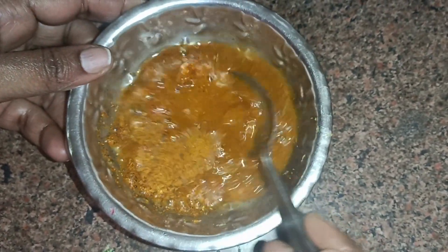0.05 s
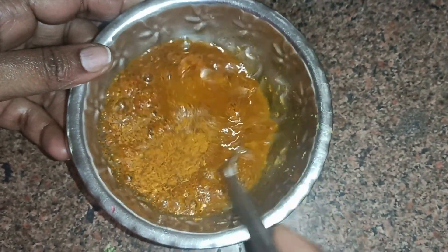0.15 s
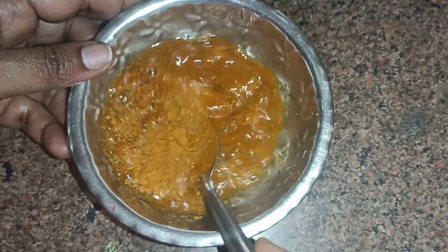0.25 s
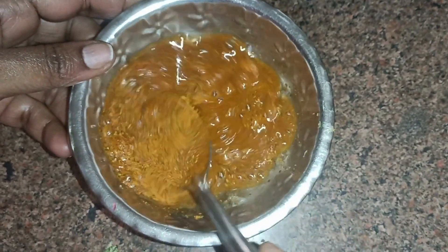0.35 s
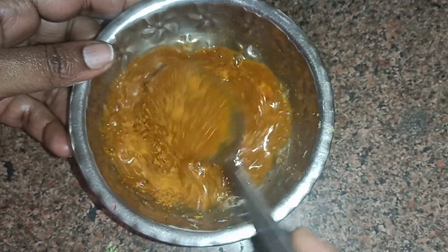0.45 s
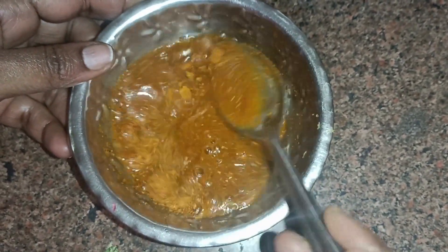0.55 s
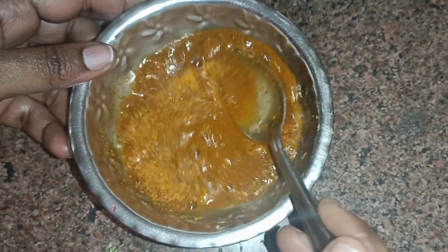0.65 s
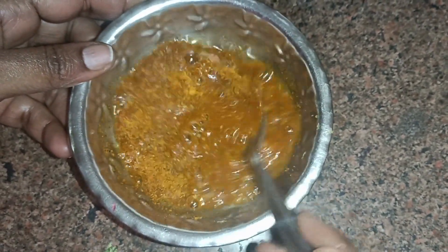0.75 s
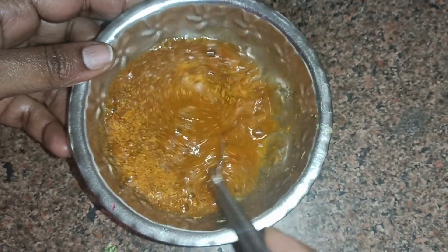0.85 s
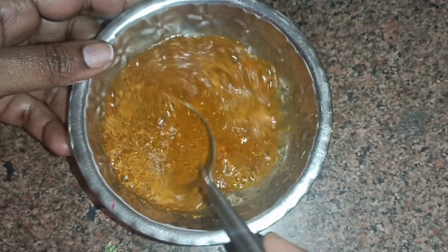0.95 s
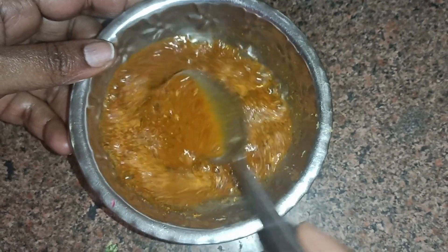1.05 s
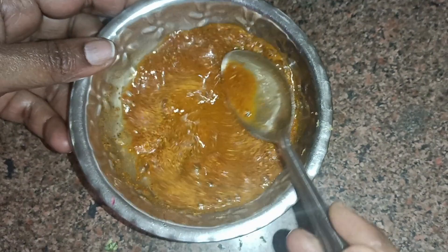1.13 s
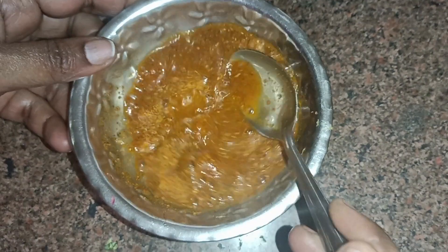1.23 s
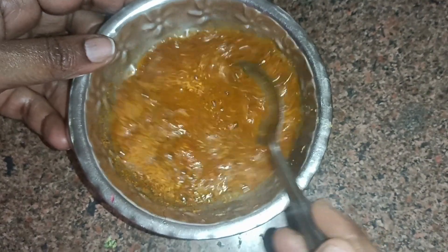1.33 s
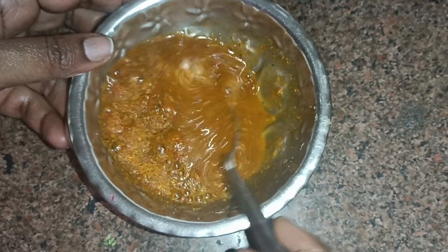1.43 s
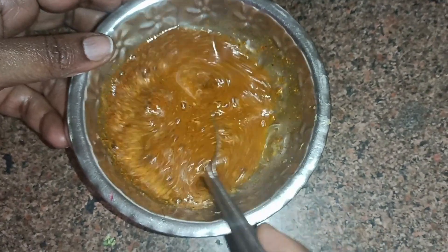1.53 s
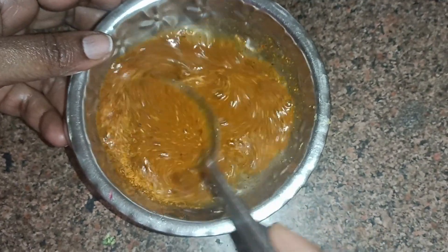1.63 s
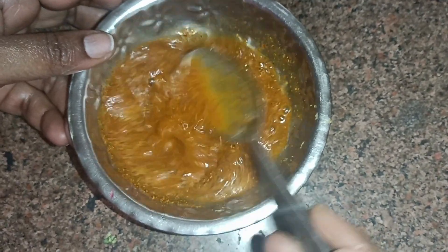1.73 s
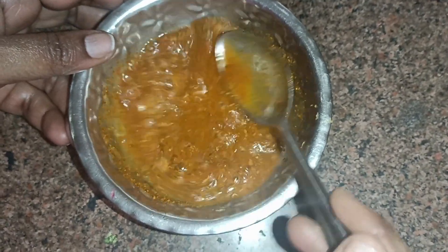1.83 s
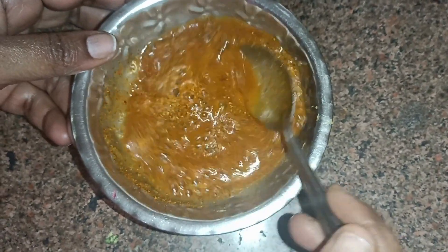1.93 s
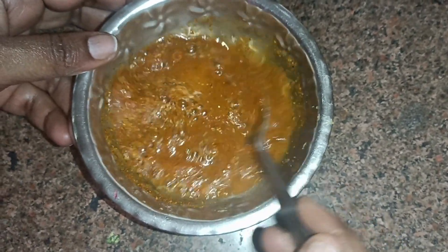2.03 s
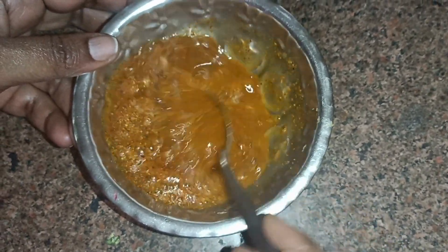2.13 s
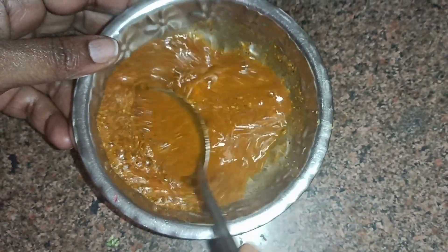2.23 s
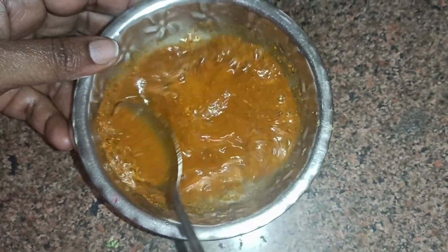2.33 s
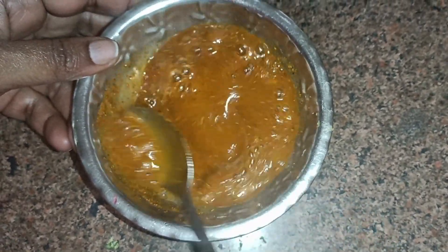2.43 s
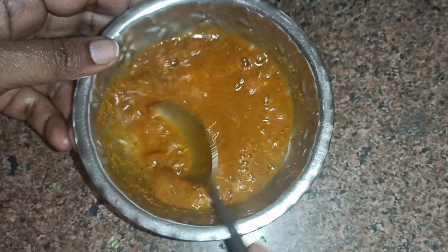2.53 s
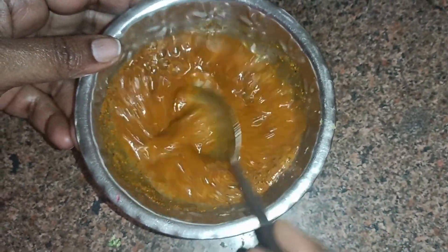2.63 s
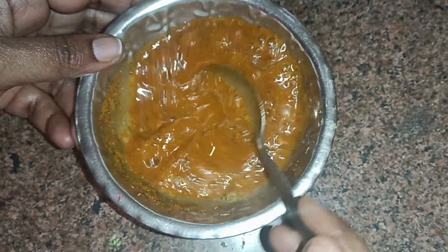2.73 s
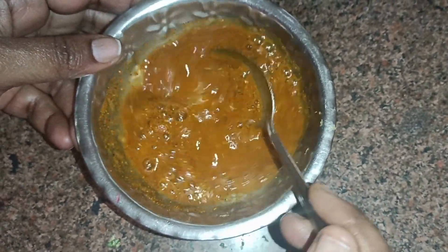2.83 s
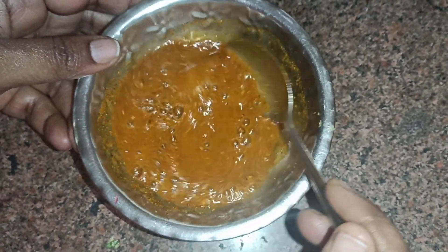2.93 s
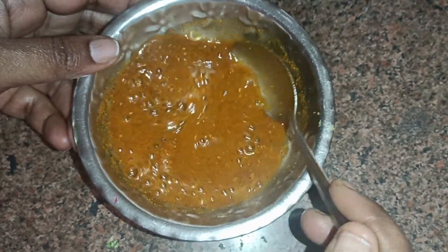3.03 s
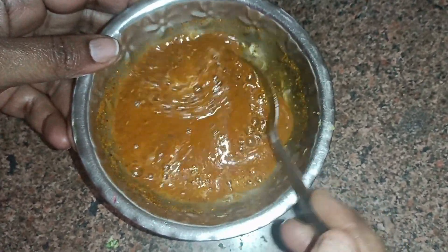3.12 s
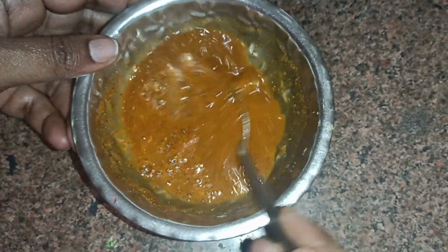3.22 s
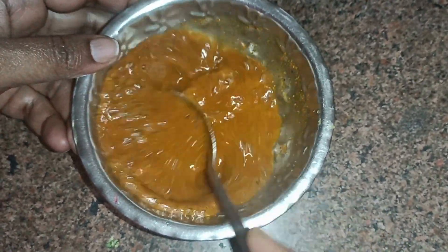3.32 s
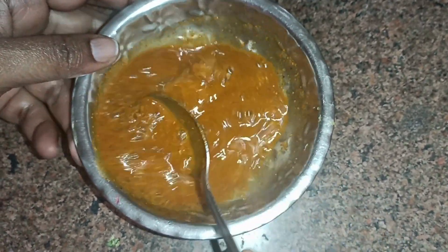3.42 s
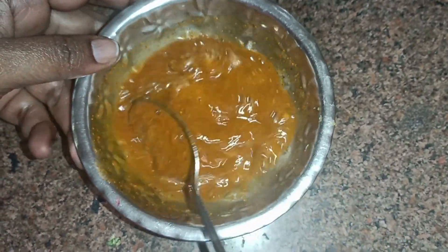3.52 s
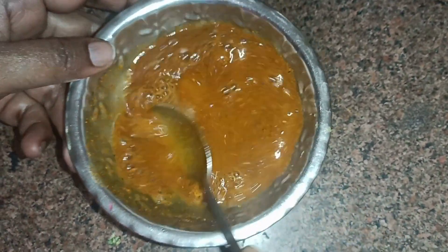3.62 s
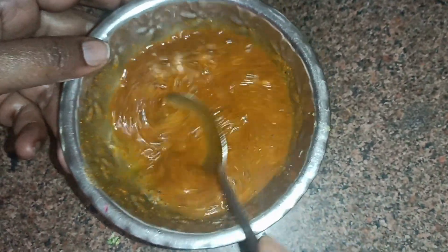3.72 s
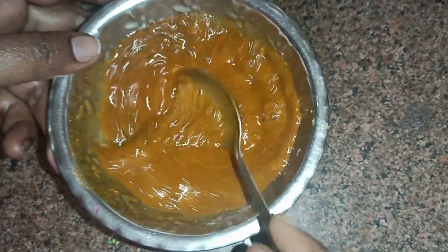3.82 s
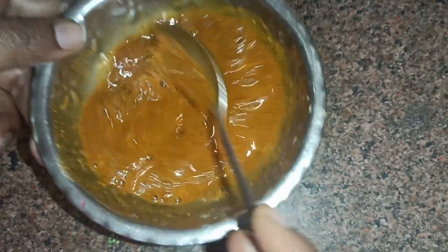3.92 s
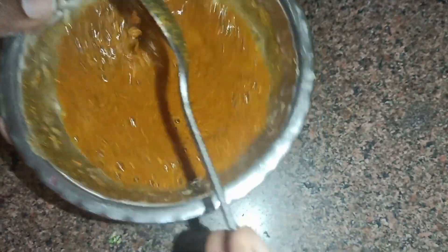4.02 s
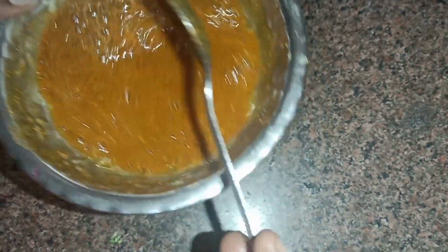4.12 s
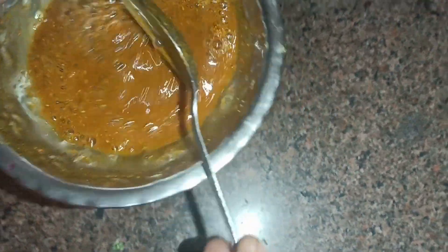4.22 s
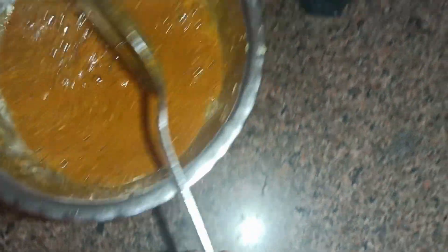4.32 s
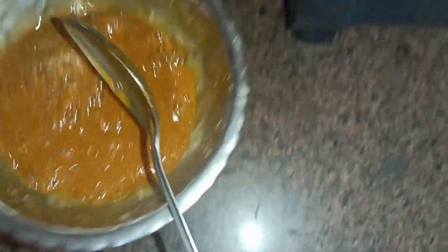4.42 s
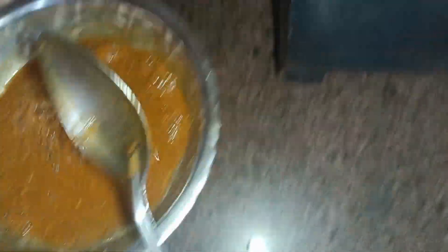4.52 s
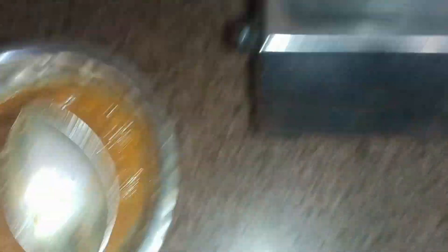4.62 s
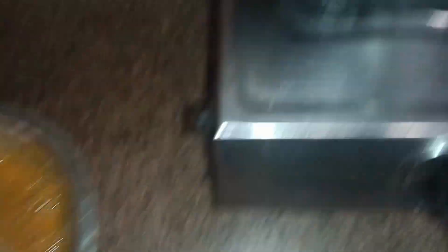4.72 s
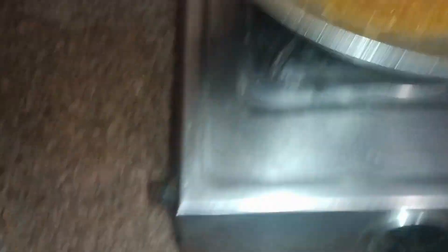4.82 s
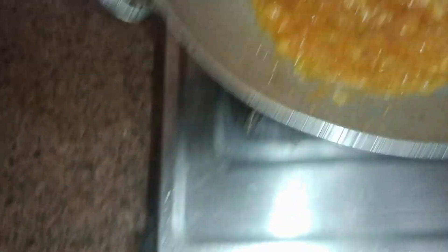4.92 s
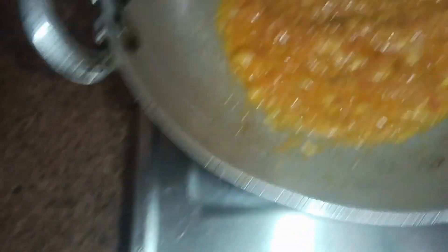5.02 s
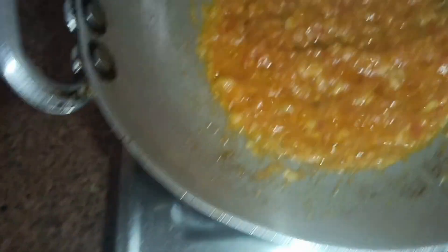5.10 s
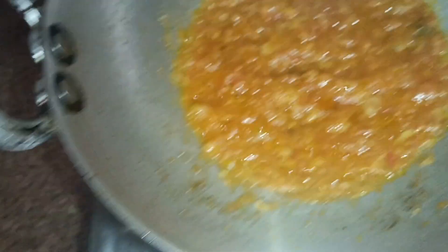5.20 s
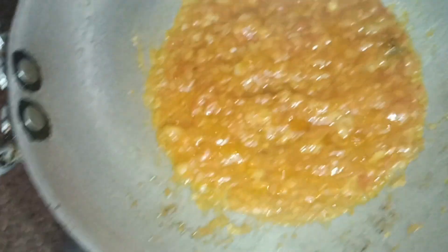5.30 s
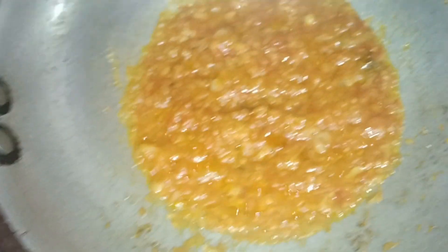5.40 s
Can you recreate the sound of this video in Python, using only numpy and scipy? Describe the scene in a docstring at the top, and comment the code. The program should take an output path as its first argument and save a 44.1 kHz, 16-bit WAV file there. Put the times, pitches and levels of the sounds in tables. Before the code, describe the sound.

Intermittent metallic scrapes stir a thick paste over a faint frying hiss, ending with a bowl drag, ringing clinks and nearer crackling sizzle.

```python
"""Stirring spice paste in a small steel bowl

A steel spoon scrapes the bowl's wall by stick-slip friction, which excites the bowl's modes, and faint fuzzy
tones slide in pitch. The bowl is dragged off a stone counter with a judder and hums in the hand; three clinks
ring the bare steel. A pan of sauce sizzles throughout as random bubble bursts, and comes close at the end.
Scrapes, clinks and spits of the pan are reflected by a small hard kitchen; a low room rumble lies under all."""
import sys
import numpy as np
from scipy import signal
from scipy.fft import rfft, irfft, next_fast_len
from scipy.io import wavfile
from scipy.ndimage import map_coordinates

SR = 44100
rng = np.random.default_rng(int(sys.argv[2]) if len(sys.argv) > 2 else 0)


def waveform_to_disk(signal):
    """Save audio, clipped to [-1, 1], as 16-bit WAV at the path in sys.argv[1]."""
    frames = np.transpose(np.atleast_2d(signal))
    scaled = np.clip(frames, -1, 1) * 32767
    samples = np.round(scaled).astype(np.int16)
    wavfile.write(sys.argv[1], SR, samples)


N = 240551
T = np.arange(N) / SR
DRAG_START_S = 4.172  # the murmur and faint tones end and the bowl's foot starts to slide
NOTE_HZ = 229  # the loaded bowl's main note


def amp(db):
    """Level law: decibels to amplitude gain."""
    return 10 ** (np.asarray(db) / 20)


def unit(x):
    """Normalization: scale to rms 1."""
    return x / np.sqrt(np.mean(x ** 2) + 1e-20)


def along(points, hz):
    """Interpolation of (Hz, value) points on a logarithmic frequency axis."""
    f, v = np.transpose(points)
    return np.interp(np.log(hz + 1), np.log(f + 1), v)


def curves(rows):
    """Linear interpolation in time: one value per sample for each column after the time."""
    s, *cols = np.transpose(rows)
    return [np.interp(T, s, c) for c in cols]


def wobble(rate):
    """Low-pass randomness: a smooth curve through random knots, rate of them a second."""
    knots = rng.standard_normal(int(N * rate / SR) + 4)
    return map_coordinates(knots, [T * rate])


def envelope(start, attack, end, release):
    """Linear growth over the attack, then from the end exponential decay by 60 dB per release."""
    rise = np.clip((T - start) / attack, 0, 1)
    return rise * amp(-60 * np.maximum(T - end, 0) / release)


def filtered(x, response):
    """Linear filtering: the spectrum of x times a response of frequency."""
    m = next_fast_len(N + SR // 2)
    return irfft(rfft(x, m) * response(np.fft.rfftfreq(m, 1 / SR)), m)[:N]


def coloured(x, spectrum):
    """Spectral shaping: x filtered by (Hz, dB) points, at rms 1."""
    return unit(filtered(x, lambda hz: amp(along(spectrum, hz))))


def band(hz, width_hz):
    """Random modulation of a carrier: narrow noise of rms 1 around a moving pitch."""
    carrier = np.exp(2j * np.pi * np.cumsum(hz) / SR)
    modulation = wobble(width_hz) + 1j * wobble(width_hz)
    return unit(np.real(modulation * carrier))


def add(track, s, x):
    """Superposition: mix x into the track at time s."""
    part = track[max(round(s * SR), 0):][:len(x)]
    part += x[:len(part)]


def ring(modes, scatter_db, tone_db=(0, 0, 0)):
    """Modal response: one contact excites damped sines, with a given strength in each register."""
    # Centres of the low, middle and high register in Hz.
    register_hz = [1600, 3200, 6500]
    t = np.arange(SR // 6) / SR
    hz, width, db = np.transpose(modes)[:, :, None]
    tone = np.interp(np.log(hz), np.log(register_hz), tone_db)
    gain = amp(db + tone + scatter_db * rng.standard_normal(hz.shape))
    sign = (-1) ** np.arange(len(hz))[:, None]  # neighbouring modes move in opposite directions
    decay = 2 * np.pi * width / SR * np.exp(-np.pi * width * t)
    return np.sum(sign * gain * decay * np.sin(2 * np.pi * hz * t), axis=0)


def kitchen(x, room_db, near_db):
    """Room acoustics: direct sound, quick echoes off bowl and counter, and a decaying diffuse tail."""
    # Reverberation of the room. Each row: frequency in Hz, time to fall 60 dB in seconds.
    reverb_s = [(200, 0.23), (1500, 0.37), (4000, 0.33), (8000, 0.2), (15000, 0.16)]
    hz, t, z = signal.stft(rng.standard_normal(SR // 2), SR, nperseg=256)
    decay = amp(-60 * t / along(reverb_s, hz)[:, None])
    tail = signal.istft(z * decay, SR, nperseg=256)[1]
    t = np.arange(len(tail)) / SR
    tail = tail * (1 - np.exp(-t / 0.0097))  # the diffuse field builds up
    near = rng.standard_normal(len(t)) * amp(-60 * t / 0.06) * (t > .001)
    echo = amp(room_db) * tail / np.linalg.norm(tail) + amp(near_db) * near / np.linalg.norm(near)
    echo[0] = 1  # direct sound
    return signal.fftconvolve(x, echo)


def rumble():
    """Broadband room noise: shaped random pressure whose level drifts slowly."""
    # Rumble spectrum. Each row: frequency in Hz, relative level in dB.
    hum_spectrum = [(15, -68), (25, -57), (59, 1), (102, 3.5), (162, 5), (189, -21), (220, 0.5), (406, -6),
                    (454, -7), (700, -19.5), (910, -22), (1540, -120)]
    return amp(-81.5 + 1.6 * wobble(6.05)) * coloured(rng.standard_normal(N), hum_spectrum)


def frying(rate, spread_db):
    """Shot noise: random bubble bursts, a few much larger than the rest, over an equally strong hiss."""
    sizes = amp(spread_db * np.minimum(rng.exponential(size=N), 5))
    bursts = (rng.random(N) < rate / SR) * rng.standard_normal(N) * sizes
    return unit(bursts) + rng.standard_normal(N)


def bubbles(rate=450, spread_db=3):
    """Bubble resonance: the bigger bubbles of the sauce each give a brief, decaying high ping."""
    out, t = np.zeros(N), np.arange(SR // 25) / SR
    for pitch, life, size in rng.standard_normal(size=(int(rate * N / SR), 3)):
        hz = np.clip(6200 * np.exp(.25 * pitch), 2500, 10000)
        decay = np.exp(-t / (.003 * np.exp(.4 * life)))
        ping = amp(spread_db * size) * decay * np.sin(2 * np.pi * hz * t)
        add(out, rng.uniform(0, N / SR), ping)
    return unit(out)


def bright_sweep():
    """Moving noise band: a bright band of the sizzle swells, sinks in pitch and dies as the pan comes near."""
    start_s, attack_s, release_s = 4.81, .07, 0.69
    hz = 6300 * 2 ** (-0.9 * np.maximum(T - start_s, 0))  # falls 0.9 octave a second
    swell = envelope(start_s, attack_s, start_s + attack_s, release_s)
    return amp(-49) * swell * band(hz, width_hz=910)


def pan():
    """Bubble noise and modal ringing: a far hiss, then fuller close sizzle where each spit rings the pan."""
    # Spectra of the pan from afar, of the finest spray, and of the pan close by.
    # Each row: frequency in Hz, relative level in dB.
    far_spectrum = [(240, -76), (400, -42), (453, -12.5), (545, -11), (719, -6), (789, -12.5),
                    (1230, -11.5), (1600, -11.5), (2250, -10), (2710, -10), (6540, 2.5), (9180, 4),
                    (13500, -29), (15000, -7.5), (16000, -17)]
    spray_spectrum = [(4000, -51), (10000, -22), (13500, 3), (14600, -11), (15500, 0), (16000, 11.5)]
    near_spectrum = [(240, -49), (400, -27), (467, -10.5), (545, -46), (719, -19.5), (1160, -29),
                     (1420, -7), (1630, -24), (2120, -15.5), (2250, -19), (2430, -31), (5960, -1.5),
                     (9320, -5.5), (11800, -27.5), (16000, -21)]
    # Close sizzle before its fade-in. Each row: time in seconds, level in dB.
    approach = [(4.75, -57), (4.84, -58), (4.9, -53), (5.0, -51), (5.28, -55.5), (5.45, -54)]
    # Modes of the pan. Each row: frequency in Hz, width in Hz, relative level in dB.
    pan_modes = [(720, 350, -22), (1415, 70, -2.5), (2870, 420, -10), (3820, 250, -9), (5200, 570, -5.5),
                 (6570, 640, 0), (7550, 1600, -13)]
    # Spits. Each row: start in seconds, then strength of the low, middle and high register in dB.
    spits = [(5.3062, -14, -14, -8.5), (5.323, -9.5, -28, -33), (5.336, -22, -41, -18),
             (5.406, -15, -15, -28)]
    far = amp(-58 + 1.0 * wobble(14)) * coloured(frying(rate=2500, spread_db=1), far_spectrum)
    spray = amp(-74) * coloured(frying(rate=2500, spread_db=2), spray_spectrum)
    close_db, = curves(approach)
    fade_in = np.clip((T - 4.4) / 0.38, 0, 1)  # the pan comes into the open
    sizzle = coloured(frying(rate=2300, spread_db=3.5), near_spectrum) + amp(-8) * bubbles()
    out = far + spray + amp(close_db) * fade_in * sizzle + bright_sweep()
    for s, *tone_db in spits:
        add(out, s, kitchen(ring(pan_modes, 2.0, tone_db), room_db=-2, near_db=0.5))
    return out


def drag():
    """Friction-induced judder: the bowl's foot rasps and groans over the stone."""
    # Rasp of the foot. Each row: frequency in Hz, relative level in dB.
    foot_spectrum = [(53, -58), (90, -32), (150, -6), (187, -8), (226, -2.5), (333, -7), (424, -2.5),
                     (528, -14), (575, -11.5), (747, -8.5), (1100, -17), (1430, -39), (2420, -120)]
    # The sound eases by 65 dB a second as the hand takes the weight.
    weight = amp(-45.5 - 65 * np.maximum(T - DRAG_START_S, 0))
    sliding = weight * envelope(DRAG_START_S, attack=0.038, end=4.368, release=0.42)
    rasp = coloured(rng.standard_normal(N) * amp(1.7 * wobble(90)), foot_spectrum)
    # The rate of judder sags once, as the foot grips.
    groan_hz = 331.3 - 95.6 * np.exp(-((T - 4.268) / .028) ** 2)
    return sliding * (amp(-4) * rasp + amp(-6) * band(groan_hz, width_hz=120))


def tilt_hum():
    """Liquid loading of a mode: one of the lifted bowl's rings bends as the liquid tilts."""
    # Bending pitch. Each row: time in seconds, frequency in Hz.
    tilt = [(4.18, 706), (4.33, 732.6), (4.42, 651), (4.46, 713), (4.61, 706), (4.68, 608), (4.73, 619),
            (4.76, 753), (4.84, 710)]
    # Free ringing. Each row: start in seconds, end of the hold in seconds, level in dB.
    free_rings = [(4.187, 4.445, -71.5), (4.616, 4.79, -67.5)]
    hz, = curves(tilt)
    note = unit(np.sin(2 * np.pi * np.cumsum(hz) / SR + .7 * wobble(80)))
    ringing = sum(amp(db) * envelope(start, .015, end, 0.11) for start, end, db in free_rings)
    return amp(2.9 * wobble(40)) * ringing * note


def churn(level_db=-89, swing_db=4):
    """Random excitation of a resonance: the moving paste keeps the bowl's main note murmuring."""
    stirring = T < DRAG_START_S
    murmur = band(np.full(N, NOTE_HZ), width_hz=90)
    return amp(level_db + swing_db * wobble(7.91)) * stirring * murmur


def notes(swell_s=0.0086, ring_db=8):
    """Damped resonance: the shoved paste makes the loaded bowl answer with brief, mostly low, soft notes."""
    # Notes. Each row: start in seconds, frequency in Hz, level in dB before the common gain ring_db.
    glugs = [(1.569, 221, -61.5), (1.66, 255, -70.5), (2.58, 229, -72), (1.871, 150, -69),
             (2.428, 229, -52.5), (2.456, 3590, -44.5), (2.459, 2770, -52), (2.501, 229, -57),
             (3.149, 230, -73), (3.395, 2180, -63), (3.631, 145, -71), (3.748, 151, -71)]
    out, t = np.zeros(N), np.arange(SR // 3) / SR
    for s, hz, db in glugs:
        t60 = 0.18 * (NOTE_HZ / hz) ** 0.33  # seconds; higher notes die sooner
        level = amp(db + ring_db - 60 * t / t60) * (1 - np.exp(-t / swell_s))
        add(out, s, level * np.sin(2 * np.pi * hz * t))
    return out


def faint_tones(rate=40, level_1khz_db=-75.5, spread_db=1.9):
    """Sliding sinusoids: short, fuzzy faint tones come and go, each sliding in pitch."""
    out, t = np.zeros(N), np.arange(SR // 8) / SR
    for pitch, life, size, slide in rng.standard_normal(size=(int(rate * DRAG_START_S), 4)):
        hz = np.clip(2500 * np.exp(.55 * pitch), 600, 5500)
        u = t / (0.013 * np.exp(0.17 * life))  # time over the time of the peak
        blur = np.cumsum(rng.normal(0, .1 * np.sqrt(hz / 1000), len(t)))  # random walk of phase
        phase = 2 * np.pi * np.cumsum(hz * (1 + slide * t)) / SR + blur
        level = amp(level_1khz_db + spread_db * size) * np.sqrt(hz / 1000)
        add(out, rng.uniform(0, DRAG_START_S), level * u * np.exp(1 - u) * np.sin(phase))
    return out


def shoves(lumpy_db=3, lumps_per_s=130):
    """Narrowing gap: paste squeezed between spoon and wall slushes in lumps, with a rising pitch."""
    # Waves of paste pushed by long sweeps. Each row: start in seconds, length in seconds, level in dB.
    sweeps = [(0.131, 0.12, -70), (0.833, .06, -69), (1.411, 0.18, -66)]
    start_hz, end_hz = 1077, 2150
    out = np.zeros(N)
    for start, length, db in sweeps:
        progress = np.clip((T - start) / length, 0, 1)
        hz = start_hz * (end_hz / start_hz) ** progress
        slush = unit(amp(lumpy_db * wobble(lumps_per_s)) * band(hz, width_hz=350))
        out += amp(db) * np.sqrt(np.abs(np.sin(np.pi * progress))) * slush
    return out


def clinks(sustain_db=7.5, sustain_width_hz=8, tick_db=-2):
    """Impact excitation: a hard contact rings bare steel, whose modes sing on faintly once the spoon is clear."""
    # Modes of the struck bowl. Each row: frequency in Hz, width in Hz,
    # relative level in dB for a blow on the wall, and the same for a blow on the rim.
    steel = [(713, 123, -28, -17), (842, 99, -34.5, -11.5), (1371, 146, -23.5, -13.5),
             (1605, 265, -19.5, -14.5), (1836, 390, -21, -25.5), (2177, 79, -28.5, -17),
             (3010, 210, -21.5, -24), (3583, 77, -13, -25), (3777, 98, -12.5, -26.5),
             (4550, 116, -10.5, -15), (4900, 77, -33, -10), (5290, 160, -11.5, -7), (5690, 140, -2.5, -11),
             (5920, 155, -3, -4.5), (6600, 280, -5, -24), (6870, 146, -2, -12), (7190, 166, -2.5, -2),
             (7650, 240, 2, -6.5), (8050, 424, 2, -11.5), (8720, 255, 5.5, -10.5), (9280, 360, -1.5, -11),
             (9710, 180, -5, -6), (10350, 550, -8, -12), (11550, 400, -12, -16.5),
             (12500, 1400, -28, -19.5), (15200, 670, -8, -20)]
    # Spoon damped by the fingers. Each row: frequency in Hz, width in Hz, relative level in dB.
    spoon_modes = [(7430, 580, -7), (9030, 670, -8)]
    # Blows. Each row: start in seconds, strength in dB, place from 0 (wall) to 1 (rim),
    # strength of the low, middle and high register in dB, level of the room's tail in dB.
    blows = [(4.1742, 11, 0.2, 4.5, 4.5, -2, 2.2), (4.3856, 12.5, 0.05, 2.5, -10.5, -4, -1.8),
             (4.6160, 10.5, 0.92, 1.5, 4.5, 1.5, -5.5)]
    out = np.zeros(N)
    hz, width, wall_db, rim_db = np.transpose(steel)
    free_width = sustain_width_hz * (1 + hz / 15000)
    for s, db, rim, *tone_db, room_db in blows:
        mode_db = wall_db + rim * (rim_db - wall_db)
        blow = ring(np.transpose([hz, width, mode_db]), 1.5, tone_db)
        song = ring(np.transpose([hz, free_width, mode_db]), 0.0, tone_db)
        add(out, s, amp(db) * kitchen(blow, room_db, near_db=-4))
        add(out, s, amp(db + sustain_db) * song)
        add(out, s, amp(db + tick_db) * ring(spoon_modes, 1.0))  # the spoon's own dry tick
    return out


def scrape(rise, fall, rate, chatter, jitter=.22, grit=0.33, others_db=-8, lock_db=-62):
    """Stick-slip friction: the spoon's edge jerks over the wall; each contact favours a few bowl modes."""
    # Modes of the bowl rubbed through the paste. Each row: frequency in Hz, width in Hz, relative level in dB.
    bowl_modes = [(633, 22, 6.5), (997, 140, 0), (1360, 162, -1), (1555, 66, 4), (1860, 71, 5),
                  (2470, 125, -5.5), (2740, 26, 3), (3154, 300, -4), (3590, 77, 3), (4130, 150, -1),
                  (4900, 65, 6), (5310, 58, -2.5), (5660, 27, -4.5), (6220, 200, -2.5), (7005, 410, -1),
                  (7480, 380, -10), (7450, 125, 2.5), (8320, 220, -14), (8560, 300, -2), (10400, 720, 2)]
    # Borders between the low, middle and high register in Hz.
    split_hz = [2200, 5200]
    # Pass band of each register. Each row: lower edge in Hz, upper edge in Hz.
    reach_hz = [(500, 2150), (2300, 5200), (5200, 8800)]
    focus = [.25, .05, .17]  # how far around the favoured pitch modes join in, as a log ratio, by register
    t = np.arange(-SR // 8, SR // 8) / SR
    hz, width, db = np.transpose(bowl_modes)
    register = np.digitize(hz, split_hz)
    sticks = np.exp(jitter * rng.standard_normal(len(t)))  # each stick lasts a different time
    stick_index = ((t - t[0]) * rate).astype(int)
    cycle = np.floor(np.cumsum(sticks[stick_index]) * rate / SR)
    slips = unit(np.diff(cycle, prepend=0) * amp(rng.normal(0, 2.8, len(t))))
    pressure = np.exp(-(t / np.where(t < 0, rise, fall)) ** 2)
    force = pressure * (slips + grit * rng.standard_normal(len(t)))  # spice grit hisses between the slips
    stroke = 0
    for k, (chatter_hz, level_db) in enumerate(np.reshape(chatter, (-1, 2))):
        # A hard push locks onto the favoured modes.
        rest_db = others_db - np.clip(level_db - lock_db, 0, 10)
        favour_db = rest_db * (1 - np.exp(-(np.log(hz / chatter_hz) / focus[k]) ** 2))
        modes = np.transpose([hz, width, db + favour_db])[register == k]
        rub = signal.fftconvolve(force, ring(modes, 2.0))
        rub = signal.sosfilt(signal.butter(3, reach_hz[k], "band", fs=SR, output="sos"), rub)
        stroke = stroke + amp(level_db) * rub * np.linalg.norm(pressure) / np.linalg.norm(rub)
    return kitchen(stroke, room_db=-15, near_db=-6)


def scrapes():
    """Friction regimes: smooth rubs slip quickly; sudden catches start hard and slip more slowly."""
    # Rubs, swelling and fading evenly. Each row: time of the hardest push in seconds (to about 1 ms),
    # half length in seconds, then chatter in Hz and its level in dB for the low, middle and high register.
    rubs = [(0.2, 0.055, 1860, -64.5, 4940, -64, 6750, -59.5),
            (0.858, 0.019, 1050, -67, 2960, -68, 7000, -57.5),
            (1.43, 0.028, 1400, -68.5, 4880, -55, 5300, -50.5),
            (1.518, 0.033, 1650, -60, 4500, -58.5, 5700, -52.5),
            (2.452, 0.024, 1390, -56, 2740, -50.5, 6200, -52.5),
            (2.4617, 0.0037, 1370, -54, 2740, -43.5, 6220, -31.5),
            (2.537, 0.017, 1820, -71, 3620, -53, 6000, -51),
            (3.611, 0.016, 1580, -51.5, 3160, -53, 5660, -47.5),
            (4.028, 0.026, 1470, -73, 3140, -60, 5600, -63), (4.51, 0.018, 1520, -85, 4600, -68, 8590, -60),
            (5.212, .02, 1310, -70.5, 4800, -59.5, 6600, -61),
            (5.445, 0.014, 600, -76, 3610, -58, 5460, -58)]
    # Catches, where the edge grips at once and skips to rest. Each row: time of the hardest push in seconds
    # (to about 1 ms), fall in seconds, then chatter in Hz and its level in dB for the three registers.
    catches = [(0.2225, 0.019, 1910, -53.5, 4900, -54, 6600, -51.5),
               (0.232, .034, 900, -59, 4700, -59.5, 6750, -62),
               (0.909, .01, 2200, -72, 2540, -55.5, 8350, -53.5),
               (0.9374, 0.011, 1860, -58, 2530, -53.5, 6440, -52),
               (2.072, .008, 700, -68, 5200, -56.5, 5460, -55),
               (2.5, 0.014, 1470, -68, 3130, -52.5, 7200, -35),
               (2.58, .003, 1790, -79, 5190, -64, 7100, -49),
               (3.128, 0.019, 1210, -77, 4150, -65, 6460, -50.5),
               (3.249, 0.042, 2090, -81, 4860, -59.5, 5200, -66),
               (3.5925, 0.018, 1150, -52, 2470, -48, 7640, -39)]
    out = np.zeros(N)
    lead_s = .126  # a stroke begins about this long before its hardest push
    for s, length, *chatter in rubs:
        add(out, s - lead_s, scrape(length, length, 760, chatter))  # nominal slips a second
    for s, fall, *chatter in catches:
        add(out, s - lead_s, scrape(0.00068, fall, 520, chatter))  # rise in seconds, nominal slips a second
    return out


def scene():
    """Superposition of the room's rumble, the pan, the bowl, faint tones, the paste and the spoon."""
    background = rumble() + pan()
    bowl = drag() + tilt_hum() + churn() + notes()
    soft = faint_tones() + shoves()
    spoon = clinks() + scrapes()
    return (background + bowl + soft + spoon)[None]


def record(dry):
    """Band-limited transduction: the microphone rolls off below 55 Hz and cuts steeply above 16 kHz."""
    def response(hz):
        top = 1 / np.sqrt(1 + (hz / 16000) ** 200)
        return top * 1j * hz / (55 + 1j * hz)
    return filtered(dry[0], response)[None]


dry = scene()
out = record(dry)
waveform_to_disk(out)
```